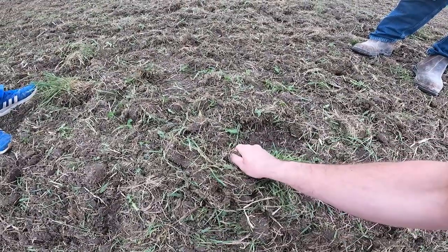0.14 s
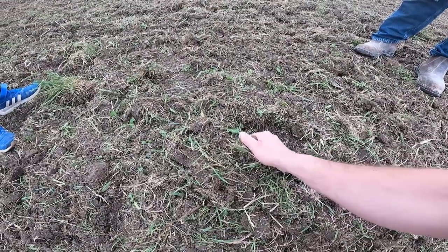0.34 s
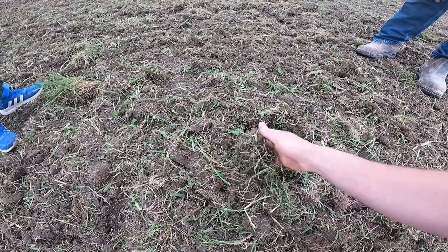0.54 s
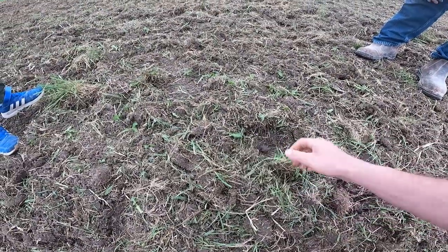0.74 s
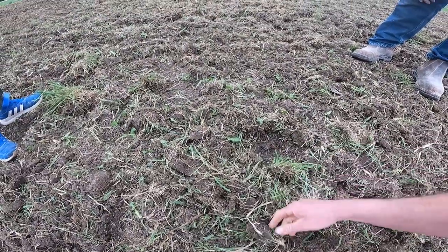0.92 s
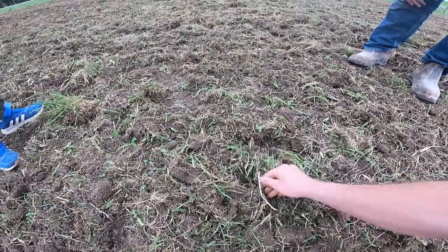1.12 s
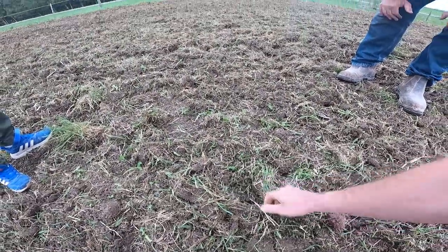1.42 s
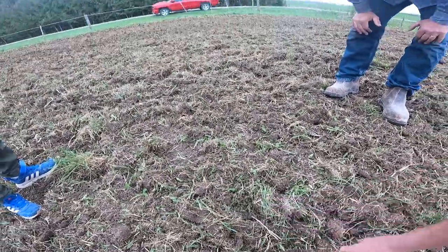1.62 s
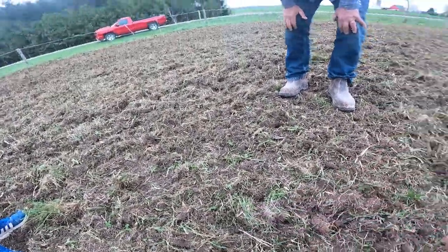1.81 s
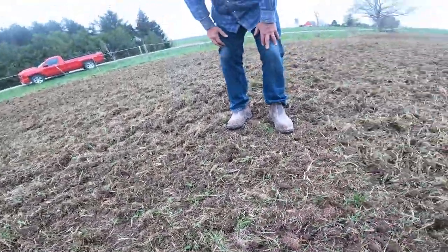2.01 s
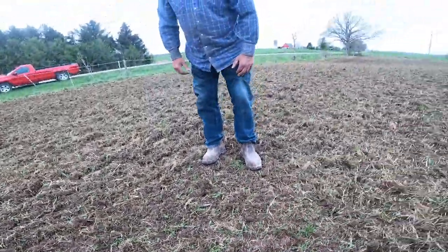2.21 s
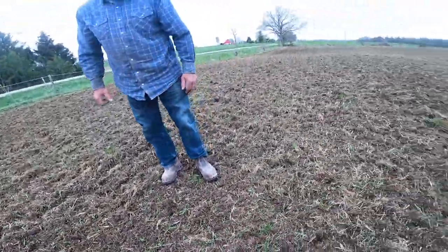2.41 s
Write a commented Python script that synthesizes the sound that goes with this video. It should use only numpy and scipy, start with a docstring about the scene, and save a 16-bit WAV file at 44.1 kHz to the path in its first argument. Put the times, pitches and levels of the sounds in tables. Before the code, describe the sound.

Wind buffets a microphone in an open field, rumbling and fluttering hardest at the start

```python
"""An open field on a breezy day, with one microphone out in the wind.
Close up, gusts heave, rumble and flutter as shaped noise, hardest at the start; one whips as a quick tone.
Some way off an engine idles, a deep hum of sines; distant birds are gliding sines with an echo.
Sleeves and dry grass rustle as grainy noise as someone drops a plant and stands up,
and damped modes make one brief rattle of clicks."""
import sys
import numpy as np
from scipy import signal
from scipy.fft import rfft, irfft
from scipy.io import wavfile
from scipy.ndimage import uniform_filter1d

SR = 44100
rng = np.random.default_rng(int(sys.argv[2]) if len(sys.argv) > 2 else 0)


def dump_mix(stems):
    """Bounce the given channels to the path in sys.argv[1] as a 16-bit WAV at rate SR."""
    frames = np.atleast_2d(stems).T  # one column per channel
    limited = np.clip(frames, -1, 1)  # hard clip at full scale
    pcm = np.round(limited * 32767).astype(np.int16)
    wavfile.write(sys.argv[1], SR, pcm)


N = 112454

# Spectra below give the balance only: each layer is scaled to rms 1 before its level is set.
# Open air over the field, spectrum: (frequency [Hz], density [dB per Hz])
AIR_SPECTRUM = [(150, -20), (400, 2.5), (750, 2), (1050, -3.5), (1550, -3), (2200, -7.5), (3200, -11.5),
                (5000, -20.5), (7200, -26), (10000, -38), (13000, -53)]
# Its loudness: (time [s], level [dB])
AIR_LEVEL = [(0, -61.5), (.25, -57.5), (.75, -58), (1.0, -60.5), (1.5, -62), (1.8, -61), (2.15, -58),
             (2.55, -58.5)]

# Distant engine
ENGINE_HZ, ENGINE_DB = 42.55, -27.5
ENGINE_WANDER, ENGINE_SWAY_DB = 0.0057, 1.54  # spread of the pitch (share) and of the level
# Exhaust overtones: (multiple of the firing rate, mean level against the fundamental [dB])
ENGINE_OVERTONES = [(2, -18), (3, -28)]
# Faint whines of the engine: (frequency [Hz], level [dB])
ENGINE_WHINES = [(770, -77), (1276, -75.5), (1595, -77.5)]

# Distant bird notes: (start [s], length [s], start pitch [Hz], middle pitch [Hz], end pitch [Hz],
# level at mid-note [dB], pitch waver [share])
BIRD_NOTES = [(0.137, 0.058, 3300, 3350, 3460, -60, 0.014), (0.157, 0.035, 3670, 3690, 3730, -65.5, .02),
              (0.133, 0.085, 6520, 6700, 7800, -70, 0.04), (0.346, .14, 4220, 4060, 3970, -73.5, 0.0041),
              (0.466, 0.042, 4020, 3930, 3650, -69.5, 0.0056), (0.406, 0.095, 3460, 3410, 3444, -60, 0.013),
              (0.555, 0.027, 3060, 4000, 4400, -65, 0.018), (0.551, 0.057, 3120, 2780, 2540, -65, 0.037),
              (0.972, 0.03, 4540, 4260, 4130, -75.5, 0.0084), (0.99, 0.088, 4100, 4020, 3970, -76, 0.0026),
              (1.051, 0.057, 3960, 4030, 3920, -70.5, 0.0019),
              (1.108, 0.039, 3910, 3720, 3480, -70.5, 0.0061), (1.188, .02, 4640, 4660, 4550, -68, 0.044),
              (1.214, 0.026, 3470, 4170, 4470, -61, 0.032), (1.236, .03, 4340, 4450, 4400, -70, 0.048),
              (1.253, .018, 3390, 3280, 3200, -64, 0.025), (1.268, 0.031, 4050, 3970, 3950, -64.5, 0.064),
              (1.318, 0.042, 3990, 4100, 3990, -70, .08), (1.868, 0.034, 2560, 2610, 2630, -64.5, 0.011),
              (2.452, 0.016, 3003, 3010, 2950, -64, 0.018)]
BIRD_ECHO_DB, BIRD_ECHO_T60_S = -6.5, 0.51

# Rustles of cloth and dry grass: (peak time [s], fall to 1/e [s], level [dB])
RUSTLES = [(.37, 0.24, -72.5), (0.836, 0.056, -66.5), (1.098, 0.11, -72), (1.295, 0.11, -62),
           (1.63, 0.073, -73), (1.993, 0.13, -63), (2.14, 0.091, -66.5), (2.26, 0.081, -65.5),
           (2.442, .055, -64)]
# Spectrum of a rustle: (frequency [Hz], density [dB per Hz])
RUSTLE_SPECTRUM = [(400, -3), (1000, 5.5), (2200, 0), (4000, -1), (5500, -4.5), (7500, -8.5), (10000, -16),
                   (13000, -39.5)]
RUSTLE_GRAIN, RUSTLE_FLICKER = 0.13, 0.15  # spreads of log gain: per sample, and slower
# Swishes and small scrapes of clothing and grass:
# (peak time [s], fall to 1/e [s], centre [Hz], width [Hz], level [dB])
SWISHES = [(.68, 0.16, 2560, 890, -83), (1.886, 0.21, 1416, 309, -64.5), (1.98, 0.006, 1580, 1300, -56),
           (2.097, 0.0096, 610, 400, -55), (2.11, .03, 1060, 895, -58), (2.237, 0.02, 1060, 380, -56),
           (2.476, .02, 2400, 905, -65)]

# Small hard clicks: (time [s], level before the top is dulled [dB])
CLICKS = [(1.6187, -50.5), (1.6222, -53.5), (1.6318, -48), (1.6405, -56)]
# Modes a click rings with: (frequency [Hz], 60 dB decay [s], level within the click [dB])
CLICK_MODES = [(250, 0.054, 4), (512, 0.017, 9), (1266, 0.031, 2), (1820, 0.011, -3), (2500, 0.0039, -20),
               (3510, 0.005, -2), (4000, 0.0081, -4.5)]
SNAP_DB, SNAP_PEAK_S = 4.5, .00006
CRACK_DB, CRACK_T60_S, CRACK_HZ, CRACK_WIDTH_HZ = -3.5, 0.024, 3200, 1900
CLICK_TOP_HZ = 6450

# Wind rumble on the microphone: (time [s], level before RUMBLE_DB is added [dB])
RUMBLE_LEVEL = [(0, -33), (.05, -63.5), (.1, -28.5), (.14, -40), (.27, -32), (.32, -38), (.39, -29.5),
                (.46, -42), (.56, -39.5), (.61, -33.5), (.65, -33.5), (.77, -36), (.84, -43), (1.0, -44.5),
                (1.2, -39), (1.35, -41), (1.48, -42), (1.68, -39), (1.82, -36), (1.98, -39), (2.1, -39),
                (2.3, -47), (2.42, -41.5), (2.53, -40.5)]
# Spectrum of the rumble: (frequency [Hz], density [dB per Hz])
RUMBLE_SPECTRUM = [(25, 0.5), (60, 7.5), (120, 3.5), (170, -4.5), (240, -18), (350, -31.5), (700, -63),
                   (3000, -83.5)]
# Slow pressure heave under the rumble: (time [s], level [dB])
HEAVE_LEVEL = [(0, -26.5), (.25, -42.5), (.45, -30), (.62, -29.5), (.78, -32), (.9, -46), (1.2, -44),
               (1.35, -31.5), (1.6, -48.5), (1.82, -35), (2.05, -44), (2.3, -32.5), (2.43, -35),
               (2.55, -26)]
# Spectrum of the heave: (frequency [Hz], density [dB per Hz])
HEAVE_SPECTRUM = [(4, 4), (15, -6.5), (30, 6.5), (52, 2), (66, -13), (150, -86)]
# Buffets, where air breaks up at the port: (peak time [s], rise from 1/e [s], fall to 1/e [s], level [dB])
BUFFETS = [(0.018, 0.0072, 0.049, -45), (0.077, 0.005, 0.0064, -34), (0.102, 0.013, 0.0095, -28),
           (0.214, 0.045, 0.037, -28.5), (.272, 0.019, 0.019, -32.5), (0.362, 0.0053, 0.017, -39),
           (0.404, 0.05, 0.031, -39.5), (.65, 0.029, 0.016, -51), (.725, 0.029, 0.055, -43),
           (1.362, 0.016, 0.01, -44.5), (1.828, 0.08, 0.24, -56)]
# Spectrum of a buffet's eddies: (frequency [Hz], density [dB per Hz])
BUFFET_SPECTRUM = [(50, -5), (120, 4), (220, 2.5), (350, -3), (500, -14), (700, -24), (1100, -40),
                   (2500, -64), (8000, -85)]
# The sharpest gust passing the port: (time [s], eddy rate [Hz], level [dB])
WHIP = [(0.088, 250.3, -45), (0.093, 258, -28.5), (0.101, 231, -32.5), (.105, 483, -34.5),
        (0.1077, 500, -35), (0.11, 480, -52)]
RUMBLE_DB, RUMBLE_EDDY_DB, BUFFET_EDDY_DB, EDDY_HZ = 4, 2, 2.2, 31
FLUTTER_EVEN_S = .012  # the flutter's own swells are evened out over this time
WHIP_WAVER, WHIP_EDGE_DB = 0.075, -15  # spread of eddy rate (share); octave at the fastest rate

RECORDER_TOP_HZ = 11800


def undb(db):
    """Decibels to gain."""
    return 10 ** (np.asarray(db) / 20)


def unit(x):
    """Scale to rms 1."""
    return x / np.sqrt(np.mean(x ** 2))


def clock():
    """Time of each sample in seconds."""
    return np.arange(N) / SR


def noise():
    """White noise over the whole scene."""
    return rng.standard_normal(N)


def bins():
    """Frequency of each spectral bin in Hz."""
    return np.arange(N // 2 + 1) * SR / N


def curve(rows):
    """Gain through (time [s], level [dB]) points."""
    return undb(np.interp(clock(), *np.array(rows).T))


def colour(x, points):
    """Weight the spectrum of x by (frequency [Hz], level [dB]) points, at rms 1."""
    hz, db = np.array(points).T
    f = np.maximum(bins(), 1)
    gain = undb(np.interp(np.log(f), np.log(hz), db))
    return unit(irfft(rfft(x) * gain, N))


def band(centre_hz, width_hz):
    """Noise in one resonance, at rms 1."""
    f = np.maximum(bins(), 1)
    detune = (f - centre_hz ** 2 / f) / width_hz
    return unit(irfft(rfft(noise()) / (1 + detune ** 2), N))


def walk(rate_hz):
    """Smooth random motion of spread 1, mostly slower than the given rate."""
    f = bins()
    return unit(irfft(rfft(noise()) * (f > 0) * np.exp(-(f / rate_hz) ** 2), N))


def decay(age, t60_s):
    """Exponential fall of 60 dB in t60_s seconds."""
    return np.exp(-np.log(1000) * age / t60_s)


def air():
    """Soft hiss of the open field: coloured noise with a slowly drifting level."""
    return colour(noise(), AIR_SPECTRUM) * curve(AIR_LEVEL)


def engine():
    """Exhaust hum of an idling engine, nearly a pure tone from afar, with thin noise-band whines."""
    rate = ENGINE_HZ * (1 + ENGINE_WANDER * walk(1))
    phase = 2 * np.pi * np.cumsum(rate) / SR
    hum = np.sin(phase)
    for multiple, db in ENGINE_OVERTONES:
        strength = undb(db + 2 * walk(0.74))  # each overtone sways by itself
        hum += strength * np.sin(round(multiple) * phase + 2 * np.pi * rng.random())
    level = undb(ENGINE_DB + ENGINE_SWAY_DB * walk(0.83))
    whine = sum(undb(db) * band(hz, 30) for hz, db in ENGINE_WHINES)
    return np.sqrt(2) * hum * level + whine


def birds():
    """Thin gliding whistles, smeared by a faint decaying echo from the trees."""
    t, song = clock(), np.zeros(N)
    for at, length, start, middle, end, db, waver in BIRD_NOTES:
        progress = np.clip((t - at) / length, 0, 1)
        glide = np.interp(progress, [0, .5, 1], [start, middle, end])
        hz = glide * (1 + waver * walk(350))
        swell = np.sin(np.pi * progress)
        song += undb(db) * np.sqrt(2) * swell * np.sin(2 * np.pi * np.cumsum(hz) / SR)
    trees = noise() * decay(t, BIRD_ECHO_T60_S)
    echo = signal.fftconvolve(song, trees / np.linalg.norm(trees))[:N]
    return song + undb(BIRD_ECHO_DB) * echo


def rustles():
    """Fine grains of rubbing cloth and grass swell and fade; duller swishes and scrapes stand out."""
    t = clock()
    roughness = np.exp(RUSTLE_GRAIN * noise() + RUSTLE_FLICKER * walk(140))
    grains = colour(noise() * roughness, RUSTLE_SPECTRUM)
    motion = sum(undb(db) * np.exp(-((t - at) / half) ** 2) for at, half, db in RUSTLES)
    out = grains * motion
    for at, half, hz, width, db in SWISHES:
        out += undb(db) * np.exp(-((t - at) / half) ** 2) * band(hz, width)
    return out


def clicks():
    """A quick rattle: each contact is a sharp snap, a short crack and damped modes, with a dull top."""
    out = np.zeros(N)
    for at, db in CLICKS:
        age = np.maximum(clock() - at, 0)
        snap = undb(SNAP_DB) * age / SNAP_PEAK_S * np.exp(1 - age / SNAP_PEAK_S)
        ring = sum(undb(g) * np.sin(2 * np.pi * hz * age) * decay(age, t60) for hz, t60, g in CLICK_MODES)
        crack = undb(CRACK_DB) * band(CRACK_HZ, CRACK_WIDTH_HZ) * (age > 0) * decay(age, CRACK_T60_S)
        out += undb(db) * (snap + ring + crack)
    return signal.sosfilt(signal.butter(2, CLICK_TOP_HZ, fs=SR, output="sos"), out)


def whip():
    """The sharpest gust sheds eddies as a wavering tone that jumps up in rate, then breaks off."""
    at, hz, db = np.array(WHIP).T
    t = clock()
    rate = np.interp(t, at, hz)
    wavering = rate * (1 + WHIP_WAVER * walk(220))
    phase = 2 * np.pi * np.cumsum(wavering) / SR + 2 * np.pi * rng.random()
    edge = undb(WHIP_EDGE_DB) * (rate / hz.max()) ** 2  # the octave grows with the rate
    strength = np.interp(t, at, undb(db), left=0, right=0)
    strength = uniform_filter1d(strength, size=60)  # soften the corners
    return np.sqrt(2) * strength * (np.sin(phase) + edge * np.sin(2 * phase))


def wind():
    """Eddies heave and rumble on the microphone; buffets swell and break into a brighter, dense flutter."""
    t = clock()
    rumble = unit(colour(noise(), RUMBLE_SPECTRUM) * undb(RUMBLE_EDDY_DB * walk(EDDY_HZ)))
    heave = colour(noise(), HEAVE_SPECTRUM)
    eddies = signal.hilbert(colour(noise(), BUFFET_SPECTRUM))
    swell = np.sqrt(uniform_filter1d(np.abs(eddies) ** 2, int(FLUTTER_EVEN_S * SR)))
    flutter = unit(eddies.real / swell * undb(BUFFET_EDDY_DB * walk(2 * EDDY_HZ)))
    push = np.zeros(N)
    for at, rise, fall, db in BUFFETS:
        push += undb(db) * np.exp(-((t - at) / np.where(t < at, rise, fall)) ** 2)
    steady = rumble * undb(RUMBLE_DB) * curve(RUMBLE_LEVEL) + heave * curve(HEAVE_LEVEL)
    return steady + flutter * push + whip()


def scene():
    """Everything at one microphone, from the far field to the wind close up."""
    return (air() + engine() + birds() + rustles() + clicks() + wind())[None]


def record(dry):
    """The recorder cuts the top with a steep low-pass."""
    return signal.sosfilt(signal.ellip(8, .2, 70, RECORDER_TOP_HZ, fs=SR, output="sos"), dry)


dry = scene()
out = record(dry)
dump_mix(out)
```